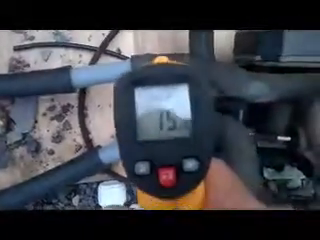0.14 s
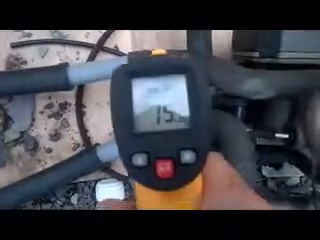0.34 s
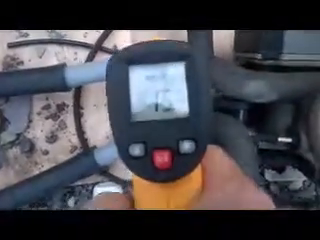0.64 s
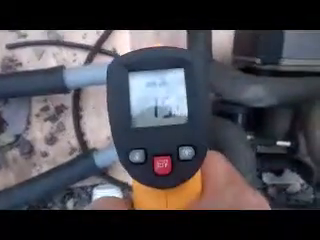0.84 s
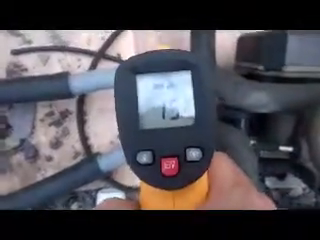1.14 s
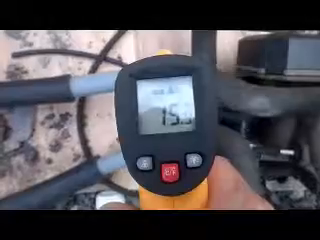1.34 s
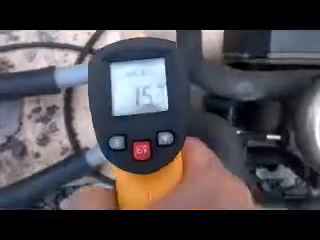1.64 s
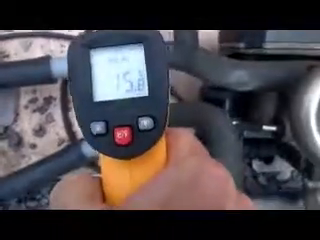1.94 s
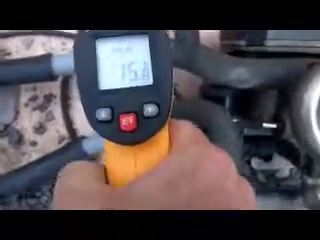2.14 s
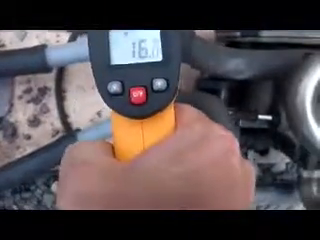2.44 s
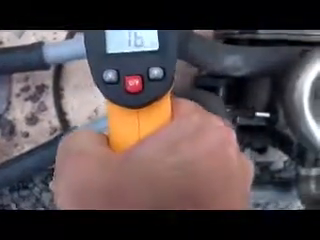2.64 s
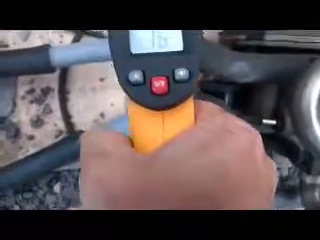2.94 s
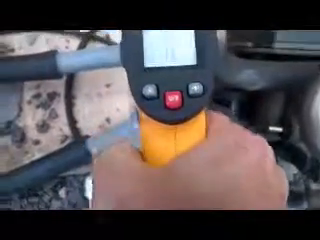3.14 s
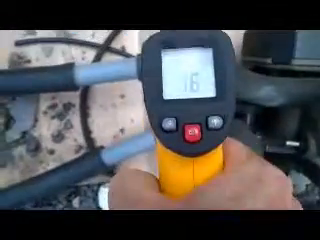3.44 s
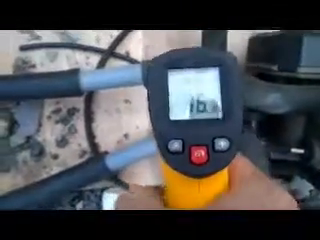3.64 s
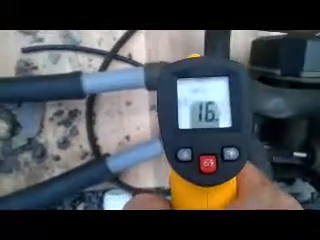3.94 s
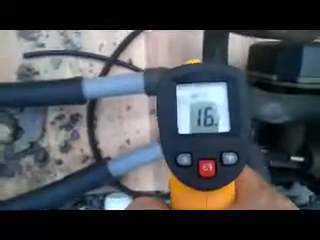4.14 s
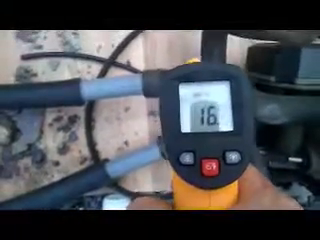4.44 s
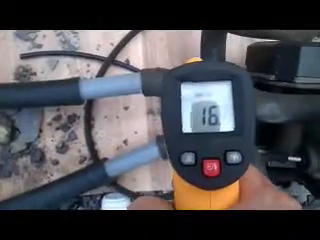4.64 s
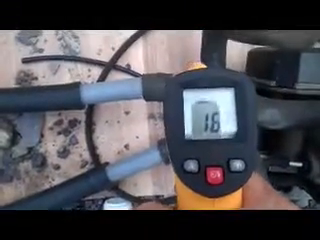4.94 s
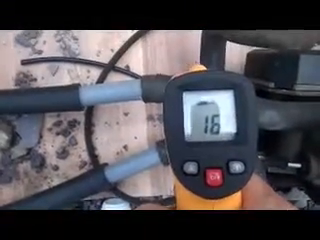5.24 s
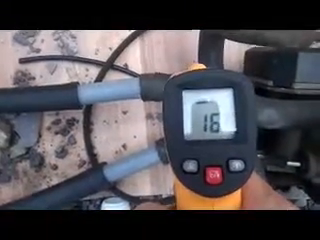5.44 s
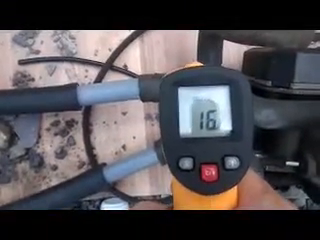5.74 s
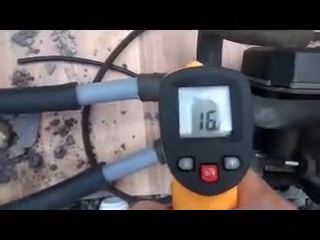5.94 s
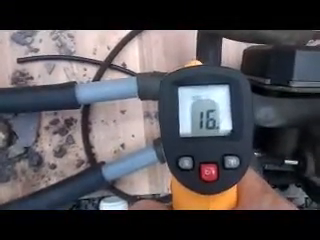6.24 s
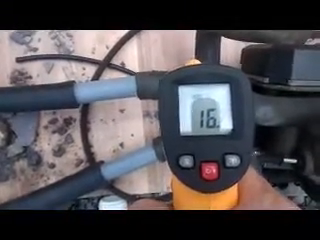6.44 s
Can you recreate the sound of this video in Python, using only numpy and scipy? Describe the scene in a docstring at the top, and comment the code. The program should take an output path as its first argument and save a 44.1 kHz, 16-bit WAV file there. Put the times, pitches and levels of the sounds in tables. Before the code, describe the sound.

A small diesel heater roars steadily up close, its blower whining and air rushing over a surging low boom, with a faint regular fuel pump tick.

```python
"""On a bench, close to a hand-held microphone, a small diesel coolant heater runs steadily.
Combustion noise roars through the resonances of chamber and exhaust pipe, and a low tone booms and surges.
The blower whines at multiples of its shaft speed; its air rushes as turbulent noise through inlet and casing.
The fuel pump ticks twice a second as short noise bursts; faint coolant pump tones and a thin hiss lie behind."""
import sys
import numpy as np
from scipy import signal
from scipy.fft import rfft, irfft, next_fast_len
from scipy.io import wavfile
from scipy.ndimage import uniform_filter1d, map_coordinates

SR = 44100
rng = np.random.default_rng(int(sys.argv[2]) if len(sys.argv) > 2 else 0)


def put_to_file(sound):
    """Save the sound as 16-bit audio at rate SR, in the file named by the first command-line argument."""
    columns = np.atleast_2d(sound).T  # one column per channel
    safe = np.clip(columns, -1, 1)
    whole_steps = np.round(safe * 32767)
    wavfile.write(sys.argv[1], SR, whole_steps.astype(np.int16))


def elevation(decibels):
    """Turn decibel levels (scalar or array-like) into linear amplitude ratios."""
    levels = np.asarray(decibels, float)
    return 10 ** (levels / 20)


N = 290663  # samples

# Resonances: (centre [Hz], width parameter [Hz], relative peak level [dB])
# of the roar in the combustion chamber
CHAMBER_MODES = [(65.5, 30, -5.5), (86, 23, -13.5), (115.4, 50.5, -10), (182, 147, -19.5),
                 (265.2, 26, -9.5), (290.2, 16.8, -4.5)]
# of the exhaust pipe
PIPE_MODES = [(449, 60, -18), (560.5, 33, -2), (692, 145, -20.5), (839.3, 45, -10.5), (982, 48, -15),
              (1040, 87, -18.5), (1130, 87, -12), (1368, 133, -15.5)]
# of the air inlet
INLET_MODES = [(1717, 116, -9), (1888.5, 124, 2), (2033, 90, -4.5), (2350, 79, -20)]
# of the casing
CASING_MODES = [(2980, 74, -10), (3210, 200, -3), (3740, 280, -3.5), (4283, 280, 2), (4550, 210, -1.5),
                (4880, 174, -4.5), (5210, 360, -14.5), (5540, 200, -23)]
# of the lowest casing mode, a close cluster
PANEL_MODES = [(2567, 79, 3), (2617, 61, -4), (2620, 45, -15)]
# of the fuel pump's tick
TICK_MODES = [(8700, 900, -3), (9800, 1300, 0), (13600, 1500, -19)]
# of the lowest bands of the fluttering hiss
LOW_HISS_MODES = [(7666, 250, 17.7), (7920, 230, 16.5)]
# of the upper bands of the fluttering hiss
HIGH_HISS_MODES = [(8450, 300, 7), (9030, 560, 1), (9720, 850, 1), (10300, 710, -16), (10780, 700, -3.5),
                   (11230, 200, -26)]
# of the faint smooth hiss
FAR_HISS_MODES = [(6600, 490, -14), (6700, 350, -0.5), (7260, 400, -2.5), (11080, 910, -3.5),
                  (12700, 520, -8), (13500, 450, -8), (14000, 500, -7), (14400, 400, -9), (14800, 500, -11),
                  (15250, 500, -13), (15680, 200, -11)]

# Strongest surges of the chamber boom: (start [s], length [s], level before smoothing [dB])
BOOM_SURGES = [(.01, 0.035, -28), (0.127, 0.14, -25.5), (.36, 0.085, -34), (0.574, .06, -32),
               (0.904, .18, -28.5), (1.188, 0.047, -25.5), (2.112, 0.056, -32), (2.214, 0.13, -27.5),
               (2.71, 0.13, -29.5), (2.912, .11, -31), (3.39, 0.093, -31), (3.603, 0.11, -29.5),
               (3.84, 0.05, -30), (4.024, .13, -31), (4.206, 0.043, -26), (4.563, 0.1, -29.5),
               (5.064, 0.076, -28), (5.215, 0.17, -31.5), (5.4, 0.08, -32), (5.572, 0.069, -26.5),
               (5.855, 0.099, -25), (6.002, 0.12, -29), (6.315, 0.045, -26), (6.404, .09, -30.5)]
# Blade tone of the blower: (time [s], level [dB])
BLADE_TONE = [(0.0, -44.5), (0.84, -42.5), (4.94, -45.5), (6.59, -44)]
# Blower tones: (multiple of the shaft speed [1], level against the blade tone [dB])
SHAFT_ORDERS = [(5, -11), (7, -18), (8, -8), (9, -7), (10, -21), (11, -22), (13, -2), (14, 0), (15, -27),
                (19, -24), (20, -39), (22, -34), (23, -39), (24, -28), (25, -33), (33, -32), (38, -44)]
# Faint tones of the coolant pump: (frequency [Hz], level [dB])
COOLANT_PUMP_TONES = [(5257, -81), (5913, -99), (15437, -108)]
# Air in the casing: (time [s], mean level of the rush [dB], level of the lowest mode [dB])
CASING_AIR = [(0, -52, -60.5), (1.4, -52, -60), (1.7, -51, -65), (2.35, -52, -66), (2.9, -55.5, -64.5),
              (3.05, -55, -59.5), (3.6, -52.5, -58.5), (4.5, -52, -54.5), (5.1, -52, -56.5),
              (6.59, -52.5, -56.5)]
# Fluttering hiss: (time [s], mean level of the upper bands [dB], mean level of the lowest bands [dB])
HISS_LEVELS = [(0, -68.5, -70), (1.5, -67.5, -71), (1.9, -70, -70), (2.1, -69.5, -71), (2.8, -73, -73),
               (3.15, -67.5, -68.5), (3.45, -66.5, -66), (3.75, -69.5, -74), (5.2, -68.5, -74.5),
               (6.59, -69.5, -75)]
# Brief dips of the hiss: (time [s], depth [dB])
HISS_DIPS = [(1.17, 11), (2.07, 8), (2.16, 9), (2.68, 5), (2.76, 8), (2.94, 7), (3.8, 5), (4.11, 6)]

CHAMBER_DB, PIPE_DB, INLET_DB = -30.5, -33.5, -41.5  # mean levels before the treble rolls off
BOOM_HZ, BOOM_WANDER_HZ = 63, 3.5
MURMUR_DB, MURMUR_SWING_DB = -39.5, 5.5  # the boom between surges
SURGE_EDGE_S = 0.0077  # outside its span a surge is 10 dB down after this time
SHAFT_HZ = 148.57  # mean turns per second
FIRST_STROKE_S, STROKE_PERIOD_S = 0.3315, 0.49972
STROKE_DB, STROKE_SCATTER_DB = -49, 1  # reference for the bursts, before their resonances
DIP_S = 0.027  # Gaussian width of a hiss dip


def unit(x):
    """Normalisation: a signal divided by its root mean square has rms 1."""
    return x / np.sqrt(np.mean(x ** 2) + 1e-20)


def curves(rows):
    """Linear interpolation: each column after the time becomes one value per sample."""
    time, *columns = np.transpose(rows)
    return [np.interp(np.arange(N) / SR, time, column) for column in columns]


def wobble(rate):
    """Slow random modulation: a smooth curve through independent normal knots, rate of them a second."""
    knots = rng.standard_normal(int(N * rate / SR) + 4)
    return map_coordinates(knots, [np.arange(N) * rate / SR])


def resonant(x, modes, skirt):
    """Resonance: unrelated modes add in power; a larger skirt darkens the valleys between them."""
    m = next_fast_len(N + 8192)
    f = np.fft.rfftfreq(m, 1 / SR) + 1e-3  # keeps clear of division by zero
    power = 0
    for centre, width, db in modes:
        detuning = (centre * centre - f * f) / (f * width)
        power = power + elevation(2 * db) / (1 + detuning ** 2) ** skirt
    return irfft(rfft(x, m) * np.sqrt(power), m)[:N]


def rush(modes, skirt):
    """Turbulence: broadband noise excites a set of resonances, scaled to rms 1."""
    return unit(resonant(rng.standard_normal(N), modes, skirt))


def muffled(x, top_hz, slope):
    """Low-pass filtering: above top_hz the power falls as frequency to the power -slope."""
    m = next_fast_len(N + 8192)
    f = np.fft.rfftfreq(m, 1 / SR)
    return irfft(rfft(x, m) / np.sqrt(1 + (f / top_hz) ** slope), m)[..., :N]


def flame():
    """Combustion noise: a turbulent flame excites the modes of the chamber and the exhaust pipe."""
    flicker_db = 0.4 * wobble(5)  # shared by both
    chamber_db = CHAMBER_DB + flicker_db + 0.46 * wobble(7.7)
    pipe_db = PIPE_DB + flicker_db + 0.48 * wobble(6)
    chamber = elevation(chamber_db) * rush(CHAMBER_MODES, skirt=1.443)
    pipe = elevation(pipe_db) * rush(PIPE_MODES, skirt=1.335)
    return muffled(chamber + pipe, top_hz=2240, slope=3.64)  # the silencer swallows the treble


def boom():
    """Thermoacoustic feedback: flame and chamber drive each other into a wandering, surging low tone."""
    t = np.arange(N) / SR
    surges = np.zeros(N)
    for start, length, db in BOOM_SURGES:
        outside_s = np.clip(np.maximum(start - t, t - start - length), 0, None)
        surges += elevation(db - 10 * (outside_s / SURGE_EDGE_S) ** 2)
    murmur = elevation(MURMUR_DB + MURMUR_SWING_DB * wobble(14))
    swell = uniform_filter1d(surges + murmur, size=900)
    hz = BOOM_HZ + BOOM_WANDER_HZ * wobble(18)
    return swell * np.sqrt(2) * np.sin(2 * np.pi * np.cumsum(hz) / SR)


def blower():
    """Rotating-machine orders: tones locked to multiples of the shaft speed, each wavering in level."""
    blade_db, = curves(BLADE_TONE)
    shaft_hz = SHAFT_HZ + 0.139 * wobble(3) + 0.081 * wobble(15)
    turn = 2 * np.pi * np.cumsum(shaft_hz) / SR
    whine = np.zeros(N)
    for order, db in SHAFT_ORDERS:
        phase = rng.uniform(0, 2 * np.pi)
        whine += elevation(db + 0.43 * wobble(9)) * np.sin(order * turn + phase)
    return np.sqrt(2) * elevation(blade_db) * whine


def air():
    """Flow noise: turbulent blower air rushes through the inlet and rings the casing."""
    casing_db, panel_db = curves(CASING_AIR)
    inlet = muffled(rush(INLET_MODES, skirt=1.79), top_hz=3020, slope=5.8)
    inlet = elevation(INLET_DB + 0.67 * wobble(3.12)) * inlet
    casing_db = casing_db + 1.0 * wobble(7.7) + 0.53 * wobble(40)
    casing = elevation(casing_db) * rush(CASING_MODES, skirt=1.88)
    panel = elevation(panel_db) * rush(PANEL_MODES, skirt=1.74)
    return inlet + panel + muffled(casing, top_hz=5600, slope=13)


def fuel_pump():
    """Impact excitation: each evenly timed stroke sends decaying noise bursts into the tick's resonances."""
    t = np.arange(SR // 20) / SR
    taps = np.zeros(N + SR)
    for stroke_s in np.arange(FIRST_STROKE_S, N / SR, STROKE_PERIOD_S):
        stroke_db = STROKE_DB + STROKE_SCATTER_DB * rng.standard_normal()
        # (lag [s], level [dB]): lead-in, the plunger's tick, a weaker tick as it springs back
        for lag, tap_db in ((-0.004, -10), (0, 3), (0.12, -7)):
            decay_db = -60 * t / 0.02  # 60 dB in 20 ms
            burst = elevation(stroke_db + tap_db + decay_db) * rng.standard_normal(len(t))
            taps[round((stroke_s + lag) * SR):][:len(t)] += burst
    return resonant(taps[:N], TICK_MODES, skirt=2)


def coolant_pump():
    """Phase modulation: faint tones of fixed mean pitch waver a little in phase."""
    t = np.arange(N) / SR
    tones = sum(elevation(db) * np.sin(2 * np.pi * hz * t + 0.64 * wobble(6.4)) for hz, db in COOLANT_PUMP_TONES)
    return np.sqrt(2) * tones


def hiss():
    """Amplitude modulation: a thin band-limited noise flutters and dips; a fainter one stays smooth."""
    high_db, low_db = curves(HISS_LEVELS)
    t = np.arange(N) / SR
    dips_db = sum(depth * np.exp(-((t - s) / DIP_S) ** 2) for s, depth in HISS_DIPS)
    flutter_db = 1.04 * wobble(16) - dips_db  # shared by both bands
    high = elevation(high_db + 1.2 * wobble(30)) * rush(HIGH_HISS_MODES, skirt=2.2)
    low = elevation(low_db + 0.99 * wobble(20)) * rush(LOW_HISS_MODES, skirt=2.2)
    far = elevation(-78.5 + 0.4 * wobble(5)) * rush(FAR_HISS_MODES, skirt=2.2)
    return elevation(flutter_db) * (high + low) + far


def scene():
    """Superposition: the pressures of all parts add at one spot."""
    mix = flame() + boom() + blower() + air() + fuel_pump() + coolant_pump() + hiss()
    return mix[None]  # one channel


def low_pass(x):
    """Removes everything above the highest recorded frequency."""
    return signal.sosfilt(signal.butter(12, 15830, fs=SR, output="sos"), x)


def record(dry):
    """Band limitation: the microphone drops the deepest bass and the recorder the highest treble."""
    mix = dry - muffled(dry, top_hz=22, slope=4)
    mix = muffled(mix, top_hz=15750, slope=1500)
    return low_pass(mix)


dry = scene()
out = record(dry)
put_to_file(out)
```